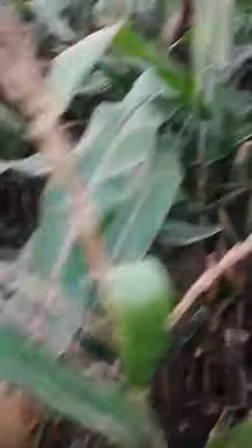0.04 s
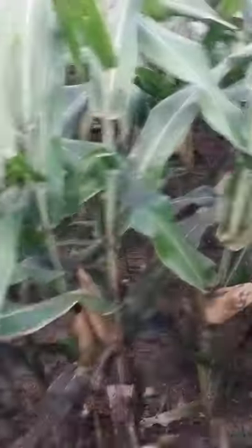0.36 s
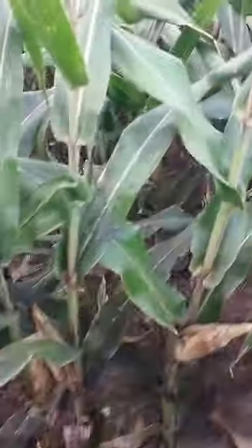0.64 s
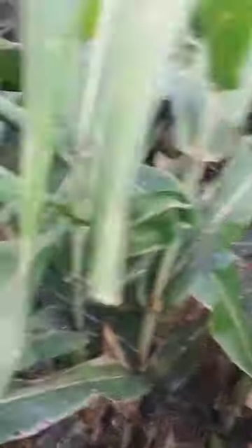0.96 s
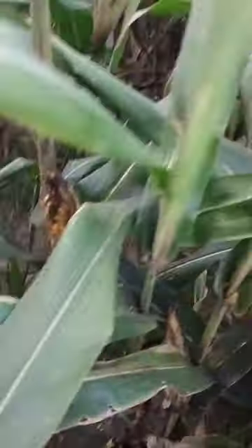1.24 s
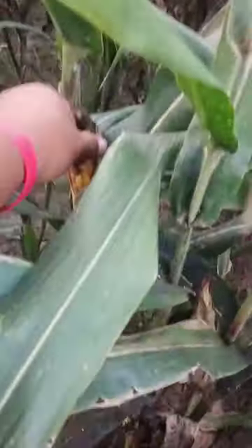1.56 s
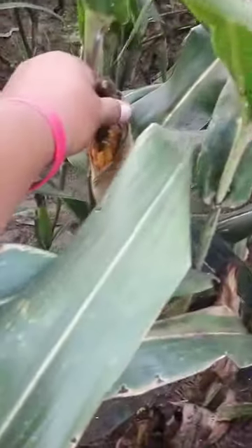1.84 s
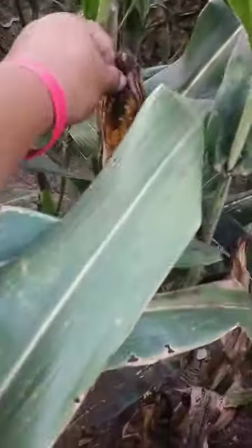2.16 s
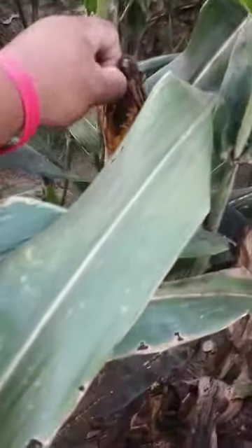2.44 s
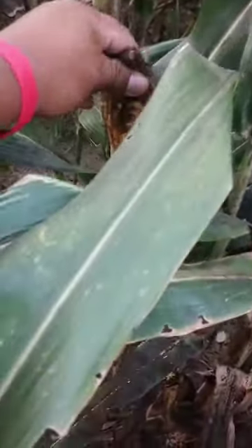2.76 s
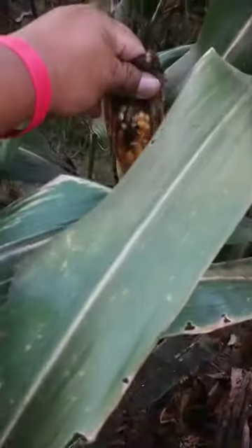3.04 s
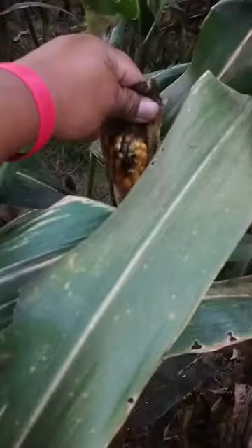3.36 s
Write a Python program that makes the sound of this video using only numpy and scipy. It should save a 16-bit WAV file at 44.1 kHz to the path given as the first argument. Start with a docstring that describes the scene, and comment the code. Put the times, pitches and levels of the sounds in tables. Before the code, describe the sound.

Corn leaves rustle against the microphone, then a dry husk is peeled with crackling rips.

```python
"""Long leaves of standing corn slide and scrape past the microphone as someone pushes through.
Their sound is stick-slip friction; a stalk knocks and rings in its damped modes.
A hand then grips an ear and peels its dry husk, which rips in short runs of fracturing fibres
and crinkles to rest. A faint low rumble lies under it all. The open field gives no echo,
only weak scattering from nearby leaves."""
import sys
import numpy as np
from scipy import signal
from scipy.fft import rfft, irfft, next_fast_len
from scipy.io import wavfile
from scipy.ndimage import uniform_filter1d, map_coordinates

SR = 44100
rng = np.random.default_rng(int(sys.argv[2]) if len(sys.argv) > 2 else 0)


def to_wav(sig):
    """Store sig (one row per channel, or 1-D mono) as 16-bit WAV at the path in sys.argv[1].

    Samples outside -1..1 are clipped; the rate is SR.
    """
    pcm = np.clip(np.atleast_2d(sig), -1, 1) * 32767
    pcm = np.round(pcm).astype(np.int16)
    wavfile.write(sys.argv[1], SR, pcm.T)  # frames by channels


N = 158760

# spectrum of leaf rubbing as heard through the microphone, with its treble peaks
# (frequency [Hz], relative level [dB])
RUBBING_AT_MIC = [(300, -4), (660, -11), (1060, -1.5), (1800, -1), (2600, -2.5), (3350, 1), (4200, -5),
                  (5100, -5), (6200, -11), (7600, -3), (8700, -10), (10000, -19.5), (12300, -22.5),
                  (14000, -14), (15400, -6)]
# spectrum of husk tearing as heard through the microphone, with its treble peaks
# (frequency [Hz], relative level [dB])
TEARING_AT_MIC = [(300, -14), (800, -18.5), (1250, -6), (1750, -0.5), (2600, -0.5), (3500, 1.5),
                  (4150, -13), (5300, -6.5), (6700, -11.5), (7800, -6), (8700, -12.5), (10300, -23),
                  (12300, -22), (14000, -13.5), (15400, -2.5)]
BAND_STARTS_HZ, TOP_HZ = (350, 1200, 4000, 10500), 15520  # bands: low, body, edge, fizz
TAPS = 1024
SLIPS_PER_S, SLIP_SPREAD_DB = 11000, 3.5


def amp(db):
    """Amplitude ratio of a level in decibels."""
    return 10 ** (np.asarray(db) / 20)


def unit(x):
    """Normalisation to rms 1."""
    return x / np.sqrt(np.mean(x ** 2) + 1e-20)


def curves(rows):
    """Linear interpolation of each column after the time, one value a sample."""
    times, *columns = np.transpose(rows)
    return [np.interp(np.arange(N) / SR, times, column) for column in columns]


def wobble(rate):
    """Smooth random modulation: a spline through rate knots a second."""
    knots = rng.standard_normal(int(N * rate / SR) + 4)
    return map_coordinates(knots, [np.arange(N) * rate / SR])


def gains(spectrum, hz):
    """Magnitude response, interpolated on a logarithmic frequency axis."""
    points_hz, db = np.transpose(spectrum)
    return amp(np.interp(np.log(hz + 1), np.log(points_hz), db))


def add(track, start, sound):
    """Superposition of a sound on the track from start seconds on."""
    part = track[round(start * SR):][:len(sound)]
    part += sound[:len(part)]


def band_clicks(spectrum, order=8):
    """Minimum-phase impulse responses of a spectrum in the four bands, each of energy 1."""
    hz = np.fft.rfftfreq(TAPS, 1 / SR)
    highpasses = [1 - 1 / (1 + (hz / edge) ** order) for edge in BAND_STARTS_HZ]
    highpasses.append(np.clip((hz - TOP_HZ) / BAND_STARTS_HZ[0], 0, 1))
    clicks = []
    for lower, upper in zip(highpasses, highpasses[1:]):
        magnitude = gains(spectrum, hz) * np.sqrt(np.abs(lower - upper * lower))
        cepstrum = irfft(np.log(np.maximum(magnitude, 1e-3)))
        cepstrum[1:TAPS // 2] *= 2  # folding the cepstrum makes the click causal
        cepstrum[TAPS // 2 + 1:] = 0
        click = irfft(np.exp(rfft(cepstrum)))
        clicks.append(click / np.linalg.norm(click))
    return clicks


def impulses(n, rate, spread_db):
    """Shot noise of rms 1: independent impulses of random sign and uneven size."""
    occurs = rng.random(n) < rate / SR
    size = amp(spread_db * np.clip(rng.standard_normal(n), -2, 2))
    return unit(occurs * rng.choice([-1, 1], n) * size)


def bending(x, depth_db):
    """Spectral modulation: the colour shifts from moment to moment as the leaves bend."""
    frames = signal.stft(x, nperseg=512)[2]
    patches = rng.standard_normal(frames.shape)
    for axis in (0, 1):
        patches = uniform_filter1d(patches, size=6, axis=axis)
    return unit(signal.istft(frames * amp(depth_db * unit(patches)), nperseg=512)[1][:N])


def noise(spectrum):
    """White noise filtered to a spectrum, rms 1."""
    white = rfft(rng.standard_normal(N))
    return unit(irfft(white * gains(spectrum, np.fft.rfftfreq(N, 1 / SR)), N))


def rumble_and_hiss():
    """Amplitude-modulated low noise swells in soft handling thumps, under the field's steady hiss."""
    # envelope of the rumble (time [s], level [dB])
    envelope = [(0, -51.5), (.3, -50), (.9, -49), (1.7, -52.5), (2.3, -51.5), (3.25, -52), (3.45, -54.5),
                (3.6, -56.5)]
    # handling thumps (time [s], level [dB])
    bumps = [(.43, -43.5), (2.168, -41)]
    # spectrum of the rumble (frequency [Hz], relative level [dB])
    rumble_spectrum = [(20, -38), (38, -14), (55, -27), (80, -7), (120, 1), (160, -1), (220, -7),
                       (320, -10), (480, -13), (750, -21), (1500, -19.5), (4000, -33.5)]
    # spectrum of the hiss (frequency [Hz], relative level [dB])
    hiss_spectrum = [(300, -4), (800, -13), (1800, -7), (3300, 1), (4500, -15), (6300, -17), (7550, -4),
                     (8600, -11), (9700, -21), (10400, -14), (11200, -23), (13000, -23), (15400, -10)]
    t, thump_s = np.arange(N) / SR, .013
    level_db, = curves(envelope)
    thumps = sum(amp(db) * np.exp(-((t - start - thump_s / 2) / thump_s) ** 2) for start, db in bumps)
    wavering = amp(level_db + 1.2 * wobble(rate=14))
    return (wavering + thumps) * noise(rumble_spectrum) + amp(-63.5) * noise(hiss_spectrum)


def crinkling():
    """Buckling: dry leaves and husk crease in clicks sparser and spikier than those of sliding."""
    # envelope of the crinkling (time [s], level [dB])
    envelope = [(0, -63.5), (.12, -60), (.2, -56.5), (1.55, -50), (1.66, -42), (1.74, -49), (1.87, -45.5),
                (1.91, -49), (2.05, -51.5), (2.19, -47), (2.23, -47.5), (2.295, -45.5), (2.36, -59),
                (2.45, -44), (2.55, -46), (2.67, -52), (2.77, -44.5), (2.83, -43), (2.95, -43.5),
                (3.08, -52.5), (3.22, -55.5), (3.35, -46.5), (3.44, -59), (3.6, -73)]
    # spectrum of husk creasing as heard through the microphone, with its treble peaks
    # (frequency [Hz], relative level [dB])
    creasing_at_mic = [(300, -6), (650, -15), (1050, -7), (1400, -3.5), (1900, -5.5), (2550, -2.5),
                       (3300, -6), (4150, -9.5), (5200, -7.5), (6500, -13), (7700, -8), (8700, -12),
                       (10300, -22), (12300, -22), (14000, -12), (15400, -3)]
    level_db, = curves(envelope)
    creases = impulses(N, rate=2800, spread_db=5)
    bands = (amp(band_db) * bending(signal.fftconvolve(creases, click)[:N], depth_db=2)
             for band_db, click in zip((-6, 0, -4, -8), band_clicks(creasing_at_mic)))
    return amp(level_db) * sum(bands)


def husk_patch(x, depth_db=2.5, width_hz=572):
    """An uneven frequency response: each patch of husk favours its own frequencies."""
    n_fft = next_fast_len(len(x) + TAPS)
    position = np.fft.rfftfreq(n_fft, 1 / SR) / width_hz
    ripple = map_coordinates(rng.standard_normal(128), [position], mode="mirror")
    return irfft(rfft(x, n_fft) * amp(depth_db * ripple), n_fft)[:len(x)]


def fibre_run(clicks, body_db, edge_db, ring_hz, length_s, release_s, fibres_per_s):
    """Impulse excitation: a run of breaking fibres drives a resonance of the sheet around them."""
    t, attack_s = np.arange(int((length_s + 6 * release_s) * SR)) / SR, .00045
    envelope = np.minimum(t / attack_s, 1) * np.exp(-np.maximum(t - length_s, 0) / release_s)
    breaks = husk_patch(envelope * impulses(SR // 8, fibres_per_s, spread_db=4.2)[:len(t)])
    low, body, edge, fizz = [unit(signal.fftconvolve(breaks, click)) for click in clicks]
    ring = unit(signal.lfilter(*signal.iirpeak(ring_hz, Q=3.7, fs=SR), body))
    lower = unit(body + .8 * ring) + amp(-18) * low
    upper = unit(edge + amp(-5) * fizz)
    envelope_rms = np.sqrt(np.sum(envelope ** 2) / len(body))
    return envelope_rms * (amp(body_db) * lower + amp(edge_db) * upper)


def tearing():
    """Brittle fracture: a rip runs through many fibres in turn; a snap is over at once."""
    # rips of husk and catches of a leaf edge
    # (time [s], duration [s], body level [dB], edge level [dB], resonance [Hz])
    rips = [(.204, 0.0072, -42, -40.5, 2500), (0.301, 0.01, -40, -35, 3300), (.731, 0.0076, -35, -45, 3230),
            (.803, 0.021, -52, -39, 2500), (1.394, 0.02, -32.5, -35, 2310),
            (1.415, 0.011, -32.5, -37, 2430), (1.45, 0.0055, -34, -31.5, 2300),
            (1.482, 0.022, -32, -39, 2650), (1.589, 0.01, -48, -37, 2300),
            (1.668, 0.025, -42.5, -37.5, 2360), (1.77, .011, -32.5, -36, 1880),
            (1.923, 0.01, -47, -43, 2000), (1.957, 0.017, -33, -34.5, 1780), (1.978, .01, -38, -39, 1860),
            (2.011, 0.0095, -31.5, -36, 1850), (2.028, 0.012, -35, -37, 2300),
            (2.043, 0.0093, -35, -40, 2120), (2.055, 0.0073, -36, -36, 2220),
            (2.084, 0.016, -37.5, -36.5, 1940), (2.11, 0.013, -39.5, -33.5, 2190),
            (2.144, 0.0065, -34.5, -31.5, 1900), (2.152, 0.0081, -36, -35, 1850),
            (2.162, 0.018, -41, -43.5, 2010), (2.329, 0.0085, -45, -48.5, 1760),
            (2.391, 0.0085, -36.5, -34.5, 2120), (2.43, 0.0044, -36.5, -34, 2400),
            (2.436, 0.013, -44, -39.5, 3200), (2.468, 0.011, -35.5, -35.5, 3300),
            (2.535, .018, -40.5, -48, 2800), (2.579, 0.013, -39, -43, 2460),
            (2.61, 0.021, -47, -47.5, 2470), (2.7, 0.02, -39.5, -47.5, 2560),
            (2.892, 0.014, -47, -41.5, 2700), (2.934, 0.0053, -42, -38.5, 2600),
            (3.023, 0.0085, -42, -41, 2680), (3.136, 0.0057, -42, -48, 2500),
            (3.233, 0.007, -45.5, -42, 2480), (3.34, 0.0054, -41.5, -38.5, 2900)]
    # snaps of a rib or fibre (time [s], body level [dB], edge level [dB], resonance [Hz])
    snaps = [(.907, -27, -29, 2800), (1.024, -29, -28, 2600), (1.179, -35, -28.5, 3600),
             (1.467, -41, -40, 2600), (1.562, -27, -27, 3000), (1.5919, -24.5, -28, 2520),
             (1.607, -39, -30, 2200), (1.644, -34, -38, 2600), (1.687, -28, -29, 2720),
             (1.717, -36, -52, 2400), (1.782, -40, -27.5, 2030), (1.998, -31, -38, 1900),
             (2.036, -26, -34, 2420), (2.081, -30.5, -36, 2400), (2.2072, -35, -51, 2200),
             (2.267, -33.5, -32, 3220), (2.528, -24.5, -29.5, 2720), (2.7475, -25.5, -31.5, 2550),
             (2.79, -50, -50, 2400), (2.794, -32.5, -40, 2580), (3.2015, -43, -40, 2400),
             (2.968, -38, -37, 2700), (3.283, -47, -40, 2600), (3.454, -56, -51, 2600)]
    out, clicks = np.zeros(N), band_clicks(TEARING_AT_MIC)
    for start, length_s, *colour in rips:
        add(out, start, fibre_run(clicks, *colour, length_s, release_s=.002, fibres_per_s=4200))
    for start, *colour in snaps:
        add(out, start, fibre_run(clicks, *colour, length_s=.00093, release_s=.0011, fibres_per_s=8400))
    return out


def among_plants(x, t60_s=.06):
    """Scattering from nearby leaves adds a weak, very short tail to the direct sound."""
    t = np.arange(SR // 10) / SR
    tail = rng.standard_normal(len(t)) * amp(-60 * t / t60_s)
    return x + amp(-17) * signal.fftconvolve(x, tail / np.linalg.norm(tail))[:N]


def sliding_leaves():
    """Stick-slip friction: three rough leaves pass in turn, each slipping thousands of times a second."""
    # band envelopes, one list a leaf
    # (time [s], low level [dB], body level [dB], edge level [dB], fizz level [dB])
    strokes = [
        [(0.222, -60, -35, -41, -39), (0.23, -42, -43, -37, -41), (0.24, -62, -45, -43, -44),
         (0.26, -44, -40.5, -39.5, -40), (0.304, -47, -38, -36.5, -43), (0.326, -73, -45, -33.5, -45),
         (0.338, -55, -41.5, -38, -44), (0.402, -63, -42.5, -35, -39), (0.415, -54, -46, -44, -50)],
        [(0.415, -52, -40.5, -44.5, -41.5), (0.475, -44, -42.5, -45.5, -43.5), (0.685, -53, -40.5, -39, -40.5),
         (0.739, -38, -34, -36.5, -43), (0.759, -52.5, -46, -46.5, -43), (0.923, -43.5, -32.5, -36.5, -39.5),
         (1.077, -48, -37.5, -38.5, -41), (1.093, -43, -35.5, -32.5, -41), (1.125, -51, -41, -48, -49)],
        [(1.125, -57, -39, -41, -50), (1.153, -67, -49, -51, -54), (1.177, -42.5, -39.5, -40.5, -47),
         (1.229, -58, -44, -46.5, -49), (1.249, -44.5, -34.5, -35.5, -41.5), (1.503, -47, -35, -36.5, -43.5),
         (1.525, -42, -36, -39.5, -44), (1.601, -49.5, -37.5, -38.5, -51), (1.635, -70, -49, -52, -57)],
    ]
    # spectrum of the first brush as heard through the microphone, with its treble peaks
    # (frequency [Hz], relative level [dB])
    first_brush_at_mic = [(300, 5), (700, -9), (1200, -2.5), (1600, -2), (2200, -0.5), (3000, 1),
                          (3900, 1.5), (4400, -8), (5000, -0.5), (6100, -8), (7000, -4), (7600, 1),
                          (8700, -4), (9700, -12.5), (12300, -17), (14000, -5), (15400, 0)]
    t, out = np.arange(N) / SR, np.zeros(N)
    fade_s, flutter_db = .006, 1
    for stroke, spectrum in zip(strokes, (first_brush_at_mic, RUBBING_AT_MIC, RUBBING_AT_MIC)):
        start, end = stroke[0][0], stroke[-1][0]
        contact = np.sqrt(np.clip(np.minimum(t - start, end - t) / fade_s + .5, 0, 1))
        slips = impulses(N, SLIPS_PER_S, SLIP_SPREAD_DB)
        friction = bending(slips * amp(flutter_db * wobble(rate=160)), depth_db=2)
        out += contact * sum(amp(db) * signal.oaconvolve(friction, click)[:N]
                             for db, click in zip(curves(stroke), band_clicks(spectrum)))
    return out


def scrape(start_s=.248, length_s=.03, ring_hz=1620):
    """Forced vibration: friction briefly drives one resonance of a stiff leaf."""
    swell = np.exp(-(2 * (np.arange(N) / SR - start_s) / length_s - 1) ** 4)
    slips = impulses(N, SLIPS_PER_S, SLIP_SPREAD_DB)
    ring = unit(signal.lfilter(*signal.iirpeak(ring_hz, Q=6.4, fs=SR), slips))
    return amp(-39) * swell * ring


def knocks():
    """Damped free vibration: a stalk bumps the camera, rasps and rings in its modes."""
    # impacts of stalks and leaves (time [s], relative level [dB])
    impacts = [(.788, -37), (1.0928, -29), (1.0964, -35), (2.7935, -41)]
    # modes of a stalk (frequency [Hz], relative level [dB], 60 dB decay time [s])
    modes = [(263, -2, 0.06), (542, -9, 0.053), (674, -5, .04), (1310, 2.5, 0.022), (1880, 6.5, .014),
             (2120, 5, 0.016), (3390, 0.5, .025)]
    out, t = np.zeros(N), np.arange(SR // 10) / SR
    low_click, rasp_t60_s = band_clicks(RUBBING_AT_MIC)[0], .067
    for start, db in impacts:
        ring = np.zeros(len(t))
        for hz, mode_db, t60 in modes:
            decay = amp(mode_db + rng.normal(0, 1.4) - 60 * t / t60)
            detuned_hz = hz * (1 + rng.normal(0, .033))
            ring += decay * np.sin(2 * np.pi * detuned_hz * t) * rng.choice([-1, 1])
        burst = rng.standard_normal(len(t)) * amp(-9 - 60 * t / rasp_t60_s)
        rasp = signal.fftconvolve(burst, low_click)[:len(t)]
        add(out, start, amp(db) * (ring + rasp))
    return out


def peeling(middle_s=2.038, length_s=.055):
    """High-frequency shot noise: a thin sizzle as the long strip of husk comes away."""
    swell = np.exp(-(2 * (np.arange(N) / SR - middle_s) / length_s) ** 4)
    slips = impulses(N, SLIPS_PER_S, SLIP_SPREAD_DB)
    fizz_click = band_clicks(TEARING_AT_MIC)[-1]
    return amp(-39) * swell * signal.fftconvolve(slips, fizz_click)[:N]


def scene():
    """Superposition of all the sources, close to one microphone."""
    rustle = sliding_leaves() + scrape() + crinkling() + peeling()
    return (rustle + among_plants(tearing() + knocks()) + rumble_and_hiss())[None]


def record(dry):
    """The microphone as a linear filter: bass roll-off, a narrow treble notch and a steep band limit."""
    bass_cut_hz, notch_hz, notch_width_hz = 54.6, 7890, 57
    n_fft = next_fast_len(N + SR // 2)
    hz = np.fft.rfftfreq(n_fft, 1 / SR)
    thinned = signal.sosfilt(signal.butter(4, bass_cut_hz, "high", fs=SR, output="sos"), dry)
    notch = 1 - .69 * np.exp(-((hz - notch_hz) / notch_width_hz) ** 2)
    band_limit = np.clip((TOP_HZ - hz) / 120 + .5, 0, 1)
    return irfft(rfft(thinned, n_fft) * notch * band_limit, n_fft)[..., :N]


dry = scene()
out = record(dry)
to_wav(out)
```